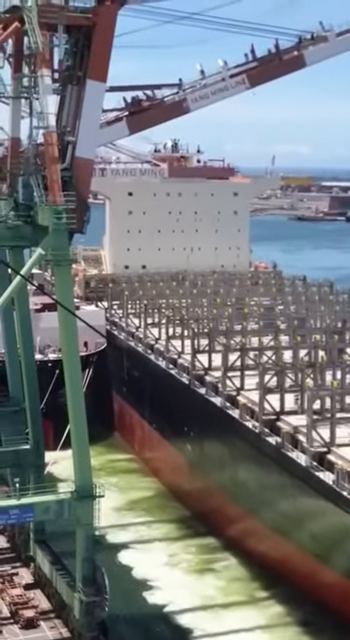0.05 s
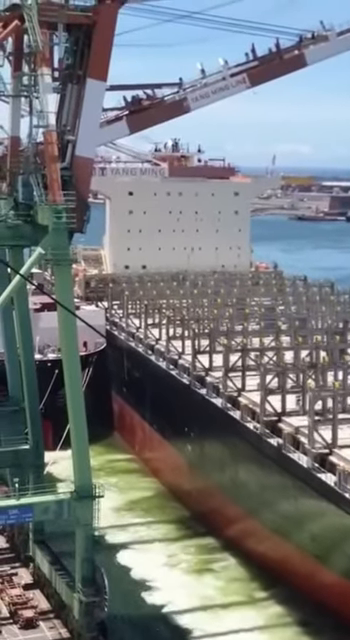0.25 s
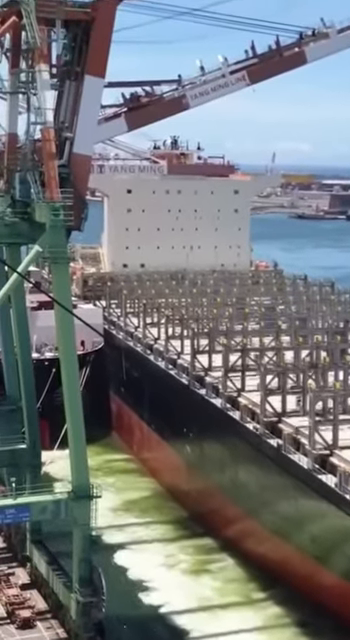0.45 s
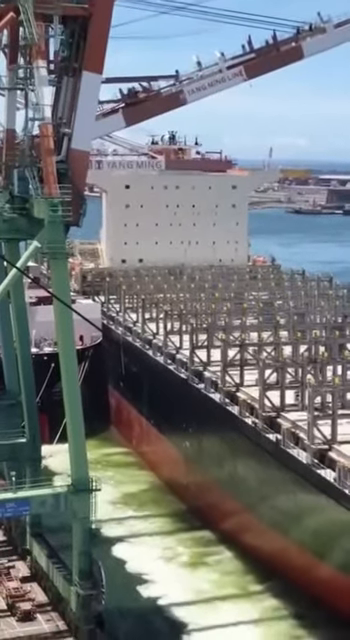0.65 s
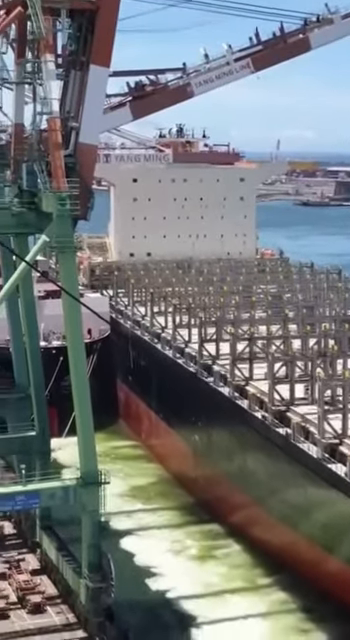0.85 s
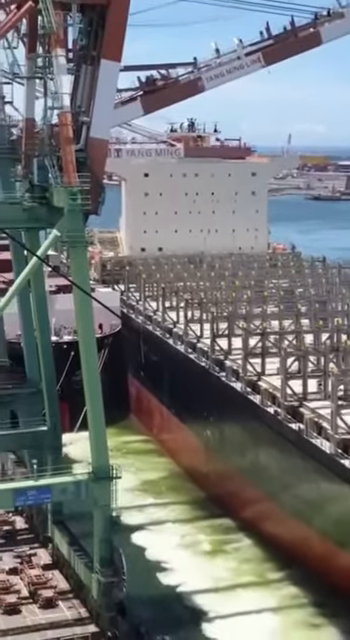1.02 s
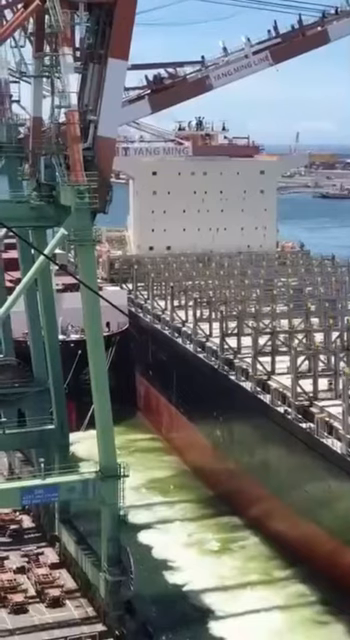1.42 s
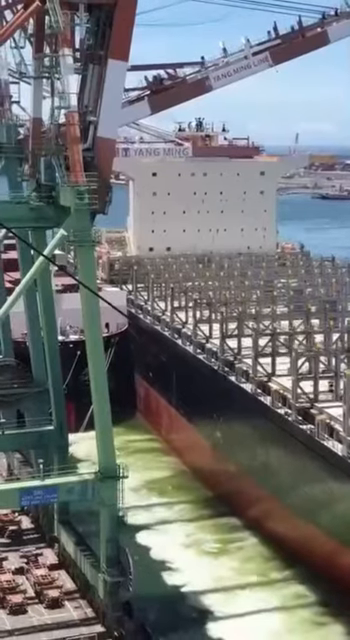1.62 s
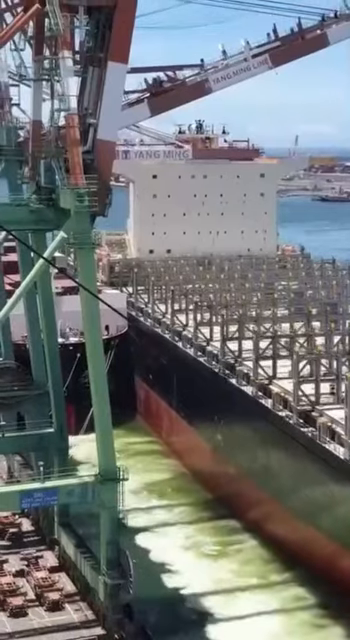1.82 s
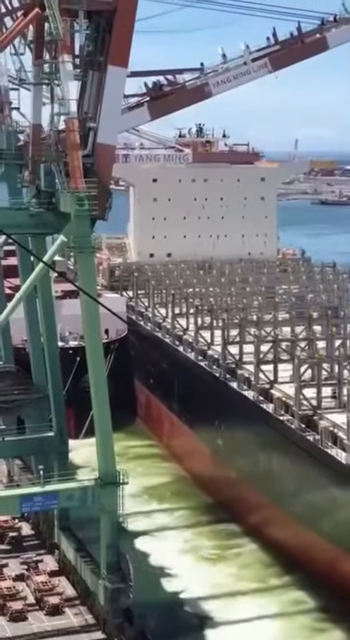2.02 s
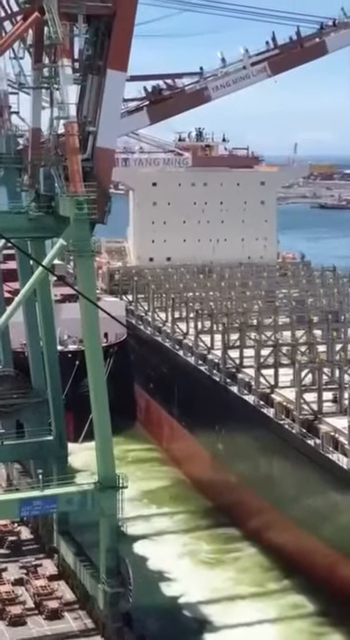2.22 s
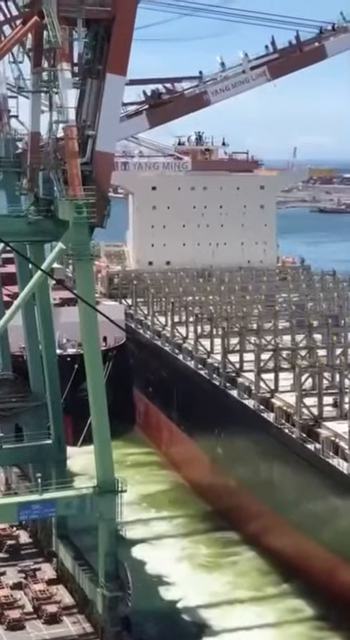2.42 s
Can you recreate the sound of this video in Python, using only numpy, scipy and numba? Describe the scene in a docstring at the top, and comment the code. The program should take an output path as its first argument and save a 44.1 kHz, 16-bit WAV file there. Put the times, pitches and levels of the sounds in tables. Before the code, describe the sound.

Heavy steel knocks boom and judder through a ship's hull over port engine rumble.

```python
"""Heavy steel knocks, two light ones and then a booming, juddering run, at a container ship's berth.
The stereo microphone is high on a quay crane, with the sound slightly to its right. Each blow crashes
the plates of a big hollow steel body, rings its modes and echoes between hull and cranes. Behind lie
engine rumble, machinery hum, wind and churning water. The boom pushes the recorder's gain down,
and it stays down."""
import sys
import numpy as np
from scipy import signal
from scipy.fft import rfft, irfft
from scipy.io import wavfile
from scipy.ndimage import uniform_filter1d
from numba import njit

SR = 44100
rng = np.random.default_rng(int(sys.argv[2]) if len(sys.argv) > 2 else 0)


def generate_wav(sig):
    """Save sig (samples, or channels by samples) to the path in sys.argv[1] as 16-bit PCM at SR."""
    pcm = np.round(np.clip(np.atleast_2d(sig).T, -1, 1) * 32767).astype(np.int16)
    wavfile.write(sys.argv[1], SR, pcm)


N = 112454

# blows on the steel: t/s, level/dB, brightness/(dB per octave), struck panel f/Hz,
# ring/dB, crash t60/s, thump/dB
BLOWS = [(0.023, -21.5, 4.5, 424, 3.5, 0.35, 4.5), (0.138, -21, -1.5, 786, 0.5, 0.85, -1),
         (0.228, -13, 5.5, 619, 6.5, 0.32, -26), (0.256, -2, -1, 572, -0.5, 0.16, -2),
         (0.276, -3.5, -2, 415, 0.5, 0.27, -5), (0.328, -1, -0.5, 580, -11.5, 0.33, -3),
         (0.351, -4.5, -1, 838, 1, 0.19, -0.5), (0.378, -10, 2.5, 417, 6.5, 0.26, 9.5),
         (0.408, -5.5, 0.4, 619, -1, 0.34, -0.5), (0.449, -5, -1.5, 285, -4.5, 0.94, -10.5),
         (0.487, -10, 1.5, 417, -3, 0.37, -4), (0.520, -5.5, -1, 198, 0.5, 0.56, -6.5),
         (0.564, -7, 0.5, 417, 1.5, 0.17, 1.5), (0.588, 3.5, 2.5, 619, -5.5, 0.12, -12.5),
         (0.609, 2, -3, 417, -3, 0.45, 3.5), (0.630, -10.5, 1.5, 417, -3, 0.15, 9),
         (0.680, -9, 6, 198, 1, 0.12, 11.5), (0.713, -8, -2, 572, -6.5, 0.15, -5),
         (0.770, -7, -0.5, 421.3, 1, 0.51, -3.5), (0.831, -6, -2, 198, 7, 0.3, 0),
         (0.858, -12.5, -0.5, 568, 8.5, 0.4, 6.5), (0.886, -8.5, -3, 197, 5.5, 0.29, 2.5),
         (0.922, -9, -0.5, 198, 4, .22, 7.5), (0.975, -10.5, -7.5, 420, -6.5, 0.16, 4.5),
         (1.142, -19, -5, 285, 4, 0.12, -8), (1.227, -20, -8, 198, 8.5, 0.17, 8.5),
         (1.421, -14, -3.5, 376, -2.5, 0.37, -16), (1.661, -12.5, -6.5, 376, -13, 0.095, -22),
         (2.146, -18, 2.5, 232, -3, 0.33, 4), (2.27, -24, 7.5, 232, -14, 1, -9)]
# stereo width of the steel at the microphone: f/Hz, side against mid/dB
STEEL_WIDTH = [(60, -27), (160, -33), (280, -9), (600, -16), (1200, -4), (2400, -0.5), (9000, -15)]
ATTACK_S = 0.0026


def undb(db):
    """Decibels to gain."""
    return 10 ** (np.asarray(db) / 20)


def curve(points, hz):
    """Gain from a table of f/Hz, level/dB, joined on a log-frequency axis."""
    f, db = np.array(points, float).T
    return undb(np.interp(np.log(hz), np.log(f), db))


def bins(size):
    """Frequencies of a spectrum, floored at 1 Hz."""
    return np.maximum(np.fft.rfftfreq(size, 1 / SR), 1)


def noise(colour, width, tilt_db=0, size=N):
    """Stereo noise of rms 1 with a given colour, width and tilt per octave from 89 to 3200 Hz."""
    hz = bins(size)
    gain = curve(colour, hz) * undb(tilt_db * np.log2(np.clip(hz, 89, 3200)))
    mid, side = rfft(rng.standard_normal((2, size))) * gain / np.sqrt(np.mean(gain ** 2))
    spread = curve(width, hz)
    return irfft(np.array([mid + spread * side, mid - spread * side]) / np.sqrt(1 + spread ** 2), size)


def walk(per_s):
    """Smooth random wavering with a spread near 1."""
    hold = max(int(SR / per_s), 1)
    steps = np.repeat(rng.standard_normal(N // hold + 1), hold)
    return np.sqrt(2) * uniform_filter1d(uniform_filter1d(steps, hold), hold)[:N]


def fade(t, rise_s, t60):
    """A rise and an exponential decay."""
    return (1 - np.exp(-t / rise_s)) * np.exp(-np.log(1000) * t / t60)


def add(out, start, x):
    """Mix a sound in at a time in seconds."""
    i = int(start * SR)
    x = x[:, :N - i]
    out[:, i:i + x.shape[1]] += x


@njit
def follow(x, attack, release):
    """Level follower with separate rise and fall."""
    out, level = np.empty(len(x)), 0.
    for i in range(len(x)):
        level += (x[i] - level) * (attack if x[i] > level else release)
        out[i] = level
    return out


def engines(width):
    """Deep engine rumble that slowly swells and sinks."""
    # rumble spectrum: f/Hz, density/dB
    colour = [(20, -20), (36, -14.5), (48, 4), (70, 2.5), (88, 4), (105, -3), (130, -8.5), (200, -14.5),
              (500, -59)]
    # course of the swell: t/s, level/dB
    swell = [(0, -2), (0.221, -3), (.39, 3.5), (.6, 3.5), (1.1, -0.5), (1.75, 3), (2.1, -1), (2.499, 2)]
    swell_db = np.interp(np.arange(N) / SR, *np.array(swell).T)
    return undb(-30.5 + swell_db) * noise(colour, width)


def machinery_hum():
    """Machinery tones, each wavering in level and pitch."""
    # hum tones: f/Hz, level/dB
    tones = [(198, -49.5), (388, -44.5), (735, -46), (757, -44)]
    hum = np.zeros(N)
    for hz, db in tones:
        level = undb(db + 3.5 * walk(7.56))
        pitch = hz * (1 + 0.014 * walk(20))
        hum += level * np.sin(2 * np.pi * np.cumsum(pitch) / SR)
    return hum


def machinery_noise(width):
    """The broad, slightly unsteady drone of port machinery."""
    # drone spectrum: f/Hz, density/dB
    colour = [(60, -41), (130, -5.5), (200, 6.5), (260, 1), (400, 0), (600, -1), (800, -9), (1100, -11),
              (2000, -15.5), (5000, -41.5)]
    return undb(-32 + walk(18)) * noise(colour, width)


def wind_and_water(width, swell_at_s=0.17, swell_width_s=0.17, swell_db=3.5):
    """Hiss of wind and of churning water below the crane; it swells briefly."""
    # hiss spectrum: f/Hz, density/dB
    colour = [(300, -18.5), (1000, 3), (2500, -3.5), (4000, -2.5), (6000, -3), (7300, -7), (8300, -22.5),
              (11500, -22), (14000, -64)]
    swell = np.exp(-((np.arange(N) / SR - swell_at_s) / swell_width_s) ** 2)
    return undb(-44.5 + swell_db * swell) * noise(colour, width)


def flicker(x, depth_db=1, per_s=26):
    """Half-octave bands from 700 Hz up flicker separately; the lowest also carries the bass."""
    spectrum = rfft(x)
    half_octaves = np.clip(2 * np.log2(bins(N) / 700), 0, 8)
    bands = (irfft(spectrum * np.maximum(1 - np.abs(half_octaves - k), 0), N) for k in range(9))
    return sum(band * undb(depth_db * walk(per_s)) for band in bands)


def port():
    """The berth from above: rumble and hum in the centre, hiss spread wide."""
    # stereo width of the background: f/Hz, side against mid/dB
    width = [(40, -27.5), (160, -19.5), (300, -19), (700, -4), (1300, 5.5), (2500, 3), (6000, 0.5),
             (9000, -10.5)]
    return engines(width) + machinery_hum() + flicker(machinery_noise(width) + wind_and_water(width))


def plate_resonances(x, depth_db=4.5, spacing_hz=14):
    """Many small resonances of the plates, the same for every blow and shallower in the bass."""
    size = 2 * N
    hz = bins(size)
    peaks = np.interp(hz / spacing_hz, np.arange(N), rng.standard_normal(N))
    cepstrum = irfft(np.log(undb(depth_db * peaks * hz / (hz + 500))), size)
    # minimum phase: the plates ring only after a blow
    cepstrum[1:N] *= 2
    cepstrum[N + 1:] = 0
    return irfft(rfft(x, size) * np.exp(rfft(cepstrum)), size)[:, :N]


def plate_crashes(size=65536):
    """Each blow crashes the loose, chattering plates and leaves a dull echo between hull and cranes."""
    # dense plate resonances: f/Hz, density/dB
    colour = [(60, -17), (125, -20), (190, 1.5), (400, -0.5), (600, 0.5), (1000, -7.5), (1250, -12.5),
              (2000, -22.5), (2800, -28.5), (4000, -34.5), (7000, -57), (12000, -83)]
    out, t = np.zeros((2, N)), np.arange(size) / SR
    echo_fade = undb(-11) * fade(t, rise_s=0.046, t60=2.55)
    for start, db, bright_db, _, _, t60, _ in BLOWS:
        judder = undb(1.7 * walk(per_s=78)[:size])
        crash = judder * fade(t, ATTACK_S, t60) * noise(colour, STEEL_WIDTH, bright_db, size)
        echo = echo_fade * noise(colour, STEEL_WIDTH, tilt_db=-3, size=size)
        add(out, start, undb(db) * (crash + echo))
    return undb(-11.5) * plate_resonances(out)


def nearness(hz, panel_hz, reach_octaves=0.52):
    """How well a blow on a panel reaches a mode, 0-1."""
    return 1 / (1 + (np.log2(hz / panel_hz) / reach_octaves) ** 2)


def body_ring():
    """Every blow tops up the body's modes near the struck panel's pitch; the nearest one also thumps."""
    # modes of the hollow steel body: f/Hz, level/dB, t60/s
    modes = [(156, -19, 0.23), (198.3, -2.5, 0.77), (232, -4, 0.54), (285, -11.5, 0.14), (376, -1, 0.5),
             (413.9, -0.5, 0.56), (576.5, -3, 0.49), (619, -11.5, 0.41), (786, -6.5, 0.48),
             (838, -8.5, 0.1), (929, -3.5, 0.64), (972, 2, 0.18), (1085, -19, 0.25), (1900, -25, 0.25)]
    out, t = np.zeros((2, N)), np.arange(N) / SR
    pitches = np.array(modes)[:, 0]
    thump = fade(t[None, :SR // 2], rise_s=0.014, t60=0.1)
    for k, (hz, mode_db, t60) in enumerate(modes):
        energy = np.zeros((1, N))
        ring = undb(mode_db - 13) * fade(t[None, :int(t60 * SR)], ATTACK_S, t60)
        for start, db, _, panel_hz, ring_db, _, thump_db in BLOWS:
            add(energy, start, (ring * undb(db + ring_db) * nearness(hz, panel_hz)) ** 2)
            if k == np.argmax(nearness(pitches, panel_hz)):
                add(energy, start, (thump * undb(db + thump_db)) ** 2)
        # random drift and beating stand for close pairs of modes
        drift_hz = 5.08 * np.sqrt(hz / 400) * walk(29.88)
        phase = 2 * np.pi * np.cumsum(hz + drift_hz) / SR
        stereo_phase = np.array([[1], [-1]]) * walk(8.06) * curve(STEEL_WIDTH, hz)
        beating = undb(1.1 * walk(24.62))
        out += np.sqrt(energy) * beating * np.sin(phase + stereo_phase)
    return out


def scene():
    """The booming steel over the port, reaching the crane slightly from the right."""
    # lag at the left microphone: f/Hz, phase/rad
    left_lag = [(100, 0), (200, -0.01), (350, 0.32), (700, 0.59), (1250, 0.5), (2200, 1.5), (4000, 3),
                (6000, 7), (8000, 7.5)]
    left, right = plate_crashes() + body_ring() + port()
    lag = np.interp(bins(N), *np.array(left_lag).T)
    return np.array([irfft(rfft(left) * np.exp(-1j * lag), N), right])


def record(dry):
    """The recorder: bass cut, gain control that ducks under the boom and recovers slowly, treble cut."""
    low_cut_hz, high_cut_hz = 42, 11600
    threshold_db, slope, attack_s, release_s = -24, 0.56, 0.3, 25
    x = signal.sosfilt(signal.butter(3, low_cut_hz, "high", fs=SR, output="sos"), dry)
    level = follow(np.abs(x).mean(axis=0), 1 / (attack_s * SR), 1 / (release_s * SR))
    gain = np.maximum(level / undb(threshold_db), 1) ** -slope
    return signal.sosfilt(signal.ellip(10, .2, 80, high_cut_hz, fs=SR, output="sos"), x * gain)


dry = scene()
out = record(dry)
generate_wav(out)
```